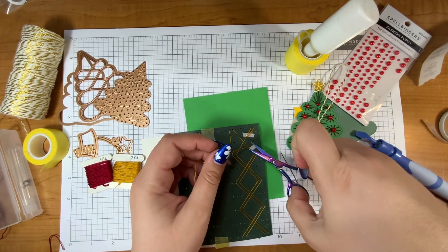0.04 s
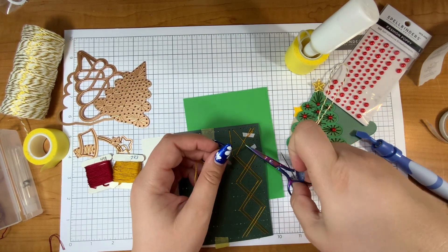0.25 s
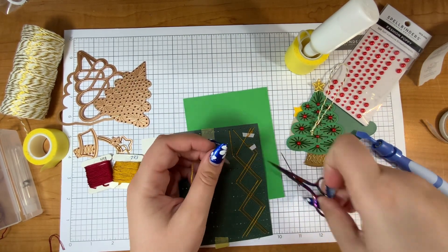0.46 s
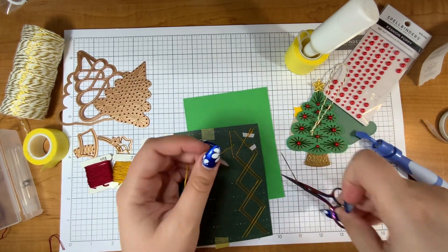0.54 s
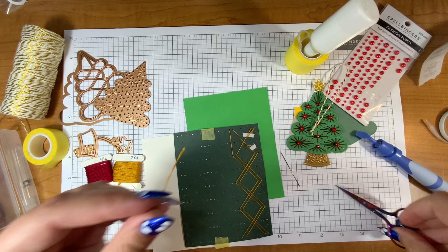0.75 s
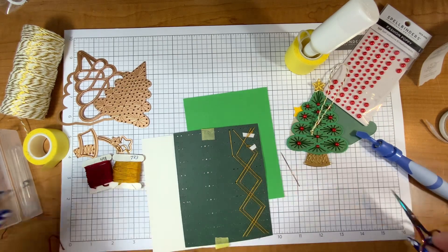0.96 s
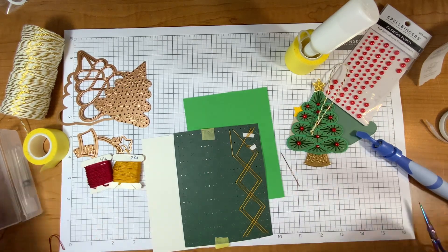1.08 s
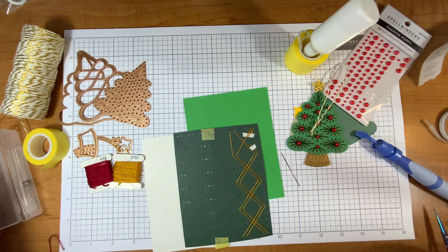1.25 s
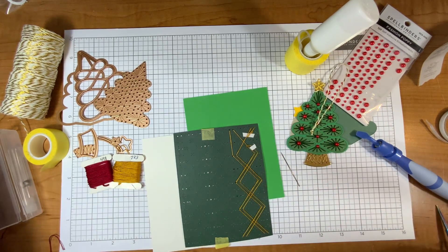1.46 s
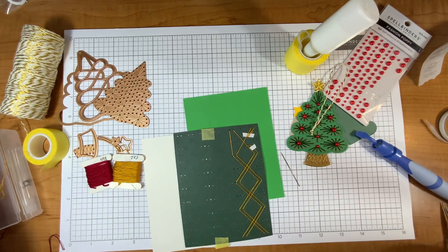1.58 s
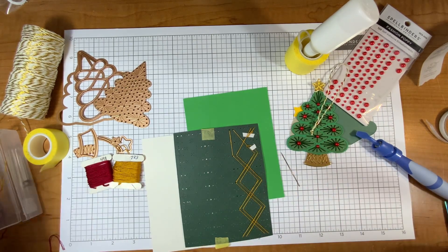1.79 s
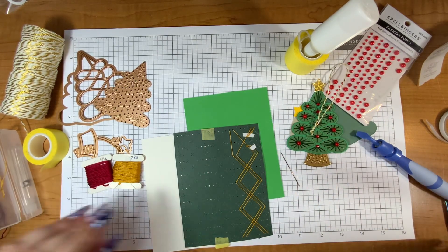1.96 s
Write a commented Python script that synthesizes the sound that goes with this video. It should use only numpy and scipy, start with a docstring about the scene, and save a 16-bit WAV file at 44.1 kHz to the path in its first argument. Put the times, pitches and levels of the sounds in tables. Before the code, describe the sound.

Scissors clatter sharply onto a craft table after one light snip and soft hand scuffs

```python
"""Scissors on a craft table

Small steel scissors snip a thread; hands tap, scuff and rub; the scissors land with a short, loud clatter.
Contacts are coloured noise bursts that excite decaying steel and table modes and a small, dry room.
Bumps sway the microphone stand at a low pitch and make its arm hum; slid fingers and hiss are shaped noise.
"""
import sys
import numpy as np
from scipy import signal
from scipy.fft import rfft, irfft
from scipy.io import wavfile

SR = 44100
rng = np.random.default_rng(int(sys.argv[2]) if len(sys.argv) > 2 else 0)


def materialize(psi):
    """Save the field psi as 16-bit PCM at rate SR to the path in sys.argv[1].

    A 1-D psi becomes a single channel; in a 2-D psi each row is a channel.
    """
    bounded = np.clip(np.atleast_2d(psi).T, -1, 1)
    quanta = np.round(bounded * 32767).astype(np.int16)
    wavfile.write(sys.argv[1], SR, quanta)


N = 89302
T = np.arange(N) / SR  # s

# table-top modes: f/Hz, level/dB, t60/s
TABLE_MODES = [(243, 4, 0.084), (229.6, 10.5, 0.17), (487.6, 12.5, 0.087), (697, 5, 0.32)]
# each steel mode is a cluster of randomly spread close partners, for a dense metallic ring
STEEL_SPREAD, STEEL_PARTNERS = 0.025, 6  # fraction of f, count


def amp(db):
    """Amplitude factor of a level in dB."""
    return 10 ** (np.asarray(db) / 20)


def decay(t_s, t60_s):
    """Exponential decay that falls 60 dB in t60_s."""
    return np.exp(-np.log(1000) * t_s / t60_s)


def read(points, hz):
    """Interpolate a (f/Hz, value) table on a log-frequency axis."""
    p = np.array(points, float)
    return np.interp(np.log(hz + 1), np.log(p[:, 0]), p[:, 1])


def colour(x, points, tilt_db_per_octave=0):
    """Minimum-phase filter of unit energy with the given spectrum, tilted about 3 kHz."""
    hz = np.arange(513) * SR / 1024
    octaves = np.log2(np.maximum(hz, 300) / 3000)
    gain = amp(read(points, hz) + tilt_db_per_octave * octaves)
    # folding the cepstrum onto positive time makes the filter causal
    cepstrum = irfft(np.log(gain))
    cepstrum[1:512] *= 2
    cepstrum[513:] = 0
    h = irfft(np.exp(rfft(cepstrum)))
    return signal.fftconvolve(x, h / np.linalg.norm(h))[:len(x)]


def noise(points):
    """Steady noise of rms 1 with the given spectrum."""
    hz = np.arange(N // 2 + 1) * SR / N
    spectrum = rfft(rng.standard_normal(N)) * amp(read(points, hz))
    x = irfft(spectrum, N)
    return x / x.std()


def contacts(rows, points, decay_s, size=4096):
    """Each contact is a sharp, coloured noise crack that dies in a few milliseconds."""
    out = np.zeros(N + size)
    for start_s, db, tilt in rows:
        crack = rng.standard_normal(size) * np.exp(-T[:size] / decay_s)
        i = int(start_s * SR)
        out[i:i + size] += amp(db) * colour(crack, points, tilt)
    return out[:N]


def ring(x, modes, spread=0., count=1):
    """Modal response of a body struck by x; each mode may be a cluster of close partners."""
    t = T[:N // 3]
    h = 0
    for hz, db, t60_s in modes:
        partners_hz = hz * (1 + spread * rng.uniform(-0.9, 1, (count, 1)))
        cluster = np.sin(2 * np.pi * partners_hz * t).sum(0)
        h = h + amp(db) * cluster * decay(t, t60_s)
    return signal.fftconvolve(x, h / np.linalg.norm(h))[:N]


def room(x, early_db, tail_db):
    """Quick reflections off the table plus a noise tail that decays per band, slowest in the bass."""
    # reverberation time: f/Hz, t60/s
    room_t60 = [(150, 0.42), (1000, 0.32), (3000, 0.3), (7000, .28), (14000, 0.34)]
    tail_rise_s, early_decay_s = 0.0017, 0.017
    edges_hz = np.geomspace(100, 16000, 9)
    tail = 0
    for lo, hi in zip(edges_hz, edges_hz[1:]):
        sos = signal.butter(3, [lo, hi], "band", fs=SR, output="sos")
        band = signal.sosfilt(sos, rng.standard_normal(N))
        tail = tail + band * decay(T, read(room_t60, np.sqrt(lo * hi)))
    tail = tail * (1 - np.exp(-T / tail_rise_s))
    early = rng.standard_normal(N) * np.exp(-T / early_decay_s)
    h = amp(tail_db) * tail / np.linalg.norm(tail)
    h = h + amp(early_db) * early / np.linalg.norm(early)
    return x + signal.fftconvolve(x, h)[:N]


def hiss():
    """Faint, steady background noise, strongest in the deep bass."""
    # noise spectrum: f/Hz, relative level/dB
    hiss_spectrum = [(15, -53), (25, 1.5), (49, 1), (66, 1.5), (198, -19.5), (274, -21), (330, -24.5),
                     (432, -20), (495, -30), (760, -29.5), (1410, -32.5), (1850, -32), (15400, -39.5)]
    return amp(-44) * noise(hiss_spectrum)


def swing(t, hz, rise_s, fade):
    """One resonance that builds up and fades; envelope peak 1."""
    env = (1 - np.exp(-(t / rise_s) ** 2)) * fade
    return env / env.max() * np.sin(2 * np.pi * hz * t)


def stand():
    """Bumps set the stand swaying deeply and its arm humming, each as one resonance."""
    # bumps: t/s, sway level/dB, arm level/dB, arm rise/s, arm length/s
    bumps = [(0.227, -29, -54.5, 0.009, 0.086), (0.425, -38, -58.5, .01, 0.1),
             (0.652, -25, -35, 0.013, 0.046), (1.047, -19, -35.5, 0.0039, 0.076),
             (1.192, -21, -38.5, 0.0058, 0.041), (1.35, -20.5, -34.5, 0.0013, 0.051),
             (1.589, -44, -26, 0.027, 0.054), (1.684, -25.5, -30.5, 0.014, 0.05),
             (1.73, -20, -13, 0.0082, 0.13)]
    sway_hz, sway_rise_s, sway_t60_s = 42.37, 0.014, 0.61
    arm_hz = 363
    arm_fade_power = 3.08  # above 2, the hum holds on and then stops sooner
    out = 0
    for start_s, sway_db, arm_db, arm_rise_s, arm_length_s in bumps:
        t = np.maximum(T - start_s, 0)
        out = out + amp(sway_db) * swing(t, sway_hz, sway_rise_s, decay(t, sway_t60_s))
        arm_fade = np.exp(-(t / arm_length_s) ** arm_fade_power)
        out = out + amp(arm_db) * swing(t, arm_hz, arm_rise_s, arm_fade)
    return out


def swishes():
    """Soft friction of fingers leaving thread and card: noise under Gaussian swells."""
    # swishes: middle t/s, width/s, level/dB, tilt/(dB/octave)
    swish_rows = [(.445, 0.025, -59, 6), (.625, 0.047, -57.5, -6.5), (1.072, 0.1, -58, 0)]
    # spectrum: f/Hz, relative level/dB
    swish_colour = [(200, -16), (1500, 8), (5000, 4), (8000, -1), (15000, -21)]
    out = 0
    for middle_s, width_s, db, tilt in swish_rows:
        swell = np.exp(-((T - middle_s) / width_s) ** 2)
        out = out + amp(db) * swell * colour(rng.standard_normal(N), swish_colour, tilt)
    return out


def rub():
    """Skin sliding over card: coloured noise that follows the level of the stroke."""
    # stroke: t/s, level/dB
    rub_level = [(0, -93), (1.0, -74), (1.08, -51.5), (1.28, -48.5), (1.32, -50.5), (1.45, -49),
                 (1.53, -53.5), (1.7, -50.5), (2.02, -64)]
    # spectrum: f/Hz, relative level/dB
    rub_colour = [(150, 8), (500, -0.5), (1200, -12), (1900, -3.5), (3000, -14), (5000, -31), (15000, -59)]
    level_db = np.interp(T, *np.array(rub_level).T)
    return noise(rub_colour) * amp(level_db)


def hands():
    """Finger and nail taps and dull, grainy scuffs excite the table modes and the room."""
    # taps, scuffs: t/s, level/dB, tilt/(dB/octave)
    tap_rows = [(.612, -51, -24), (.652, -41.5, 1), (.762, -50, -10), (.972, -44.5, -1),
                (1.0420, -31.5, 2.5), (1.0445, -27, -2.5), (1.102, -39, 1.5), (1.1855, -33, 2.5),
                (1.188, -41, 4), (1.683, -29, 2.5), (1.686, -40, -8)]
    scuff_rows = [(1.339, -30.5, 0), (1.345, -28.5, -2.5), (1.362, -37, -1.5), (1.461, -42.5, -0.5),
                  (1.586, -33.5, -1.5), (1.599, -38, -2)]
    # spectra: f/Hz, relative level/dB
    tap_colour = [(100, -6.5), (230, 13.5), (480, 5.5), (800, -9), (1600, -3), (2400, 0), (3600, -6.5),
                  (5500, -21), (9000, -34), (15000, -55)]
    scuff_colour = [(100, -17), (250, 11.5), (450, 12), (750, 5), (1400, -5.5), (1900, 4.5), (2450, 8.5),
                    (3500, -10.5), (4300, -5.5), (4900, -8), (5800, -19), (15000, -22)]
    x = contacts(tap_rows, tap_colour, decay_s=0.0041)
    x = x + contacts(scuff_rows, scuff_colour, decay_s=0.0077)
    table = amp(-17.5) * ring(x, TABLE_MODES)
    return room(x, early_db=-6.5, tail_db=-11) + table


def snip():
    """Blades close with a double click, then tick as they are carried; damped steel modes ring."""
    # closing blades, loose-blade ticks: t/s, level/dB, tilt/(dB/octave)
    snip_rows = [(.2222, -26, 1), (.2242, -21.5, 0.5)]
    tick_rows = [(.857, -39.5, -2.5), (.860, -47, 4), (1.0968, -28.5, 24), (1.0985, -46, -13)]
    # spectra: f/Hz, relative level/dB
    snip_colour = [(300, -14), (1000, -12.5), (2000, -7.5), (2900, 4.5), (4100, -11.5), (5100, -1),
                   (6800, -18), (8700, 2.5), (11500, -15), (15500, -13.5)]
    tick_colour = [(500, -42), (2000, -13), (5000, 2), (8500, 10.5), (12000, -5), (15500, -21)]
    # blade modes, handles damped by the hand: f/Hz, level/dB, t60/s
    blade_modes = [(5300, -14, .15), (8900, -1, .26), (8600, -3, .3), (10280, -8, .25)]
    x = contacts(snip_rows, snip_colour, decay_s=0.0014)
    x = x + contacts(tick_rows, tick_colour, decay_s=0.0026)
    blades = amp(-31) * ring(x, blade_modes, STEEL_SPREAD, STEEL_PARTNERS)
    return room(x, early_db=-8, tail_db=-12.5) + blades


def set_down():
    """The scissors land, bounce and settle; each contact excites steel and table-top modes."""
    # landing and bounces: t/s, level/dB, tilt/(dB/octave)
    clatter_rows = [(1.706, -33, -1.5), (1.7192, -8, 2), (1.7215, -6, -3), (1.7322, 3.5, 1.5),
                    (1.7352, -9.5, -7.5), (1.7395, -26, 11), (1.7455, -23.5, -7), (1.7543, -9.5, -3.5),
                    (1.757, -13.5, 1.5), (1.769, -8.5, 2.5), (1.7725, -11.5, -0.5), (1.7792, -14.5, -4.5),
                    (1.7865, -14, -1.5), (1.797, -14.5, -4.5), (1.806, -19, -3), (1.816, -16.5, -4),
                    (1.824, -13, -5.5), (1.831, -19, -2), (1.846, -33, -2)]
    # spectrum: f/Hz, relative level/dB
    clatter_colour = [(100, -14.5), (250, -7), (550, -7), (900, -9), (1500, -3.5), (2200, 1), (3100, 1.5),
                      (3800, 1.5), (4400, -5), (5000, -3), (6200, -7.5), (7600, -3.5), (10500, -17),
                      (13800, -25), (15500, -28)]
    # free steel modes: f/Hz, level/dB, t60/s
    steel_modes = [(1592, -3, .4), (1990, -8, 0.43), (2196, 0.5, 0.52), (2388, 13.5, 0.12),
                   (2660, -12, 0.35), (2750, 0, .5), (2875, 5.5, 0.42), (3140, -5, 0.38), (3530, -12, 0.2),
                   (3310, 3, 0.49), (3690, 2, .35), (4200, -5, .4), (5100, -3.5, .5), (5959, 11, .35),
                   (7122, -3, 0.46), (8000, -16, 0.98), (7500, -2, .35), (9300, 0, 0.69)]
    x = contacts(clatter_rows, clatter_colour, decay_s=0.0043)
    steel = amp(-16.5) * ring(x, steel_modes, STEEL_SPREAD, STEEL_PARTNERS)
    table = amp(-25) * ring(x, TABLE_MODES)
    return room(x, early_db=-6.5, tail_db=-11) + steel + table


def scene():
    """One close microphone feeds both channels."""
    mono = hiss() + stand() + swishes() + rub() + hands() + snip() + set_down()
    return np.array([mono, mono])


def record(dry):
    """The recorder clips at full scale, then a steep low-pass cuts the top."""
    drive_db, top_hz = 0.5, 15500
    clipped = np.clip(dry * amp(drive_db), -1, 1)
    low_pass = signal.ellip(8, .2, 70, top_hz, fs=SR, output="sos")
    return signal.sosfilt(low_pass, clipped)


dry = scene()
out = record(dry)
materialize(out)
```